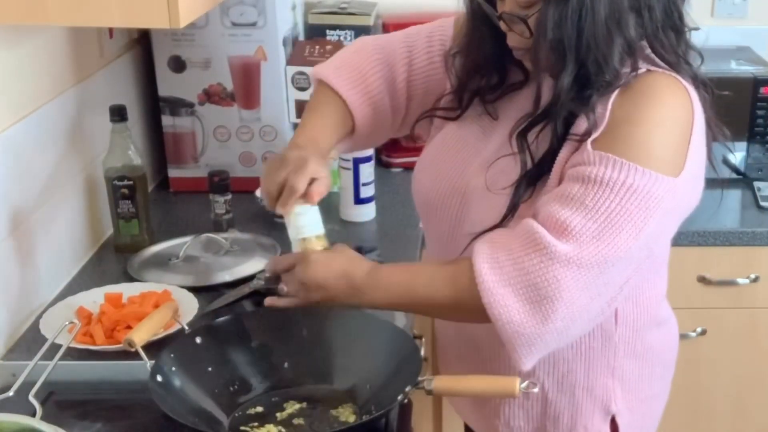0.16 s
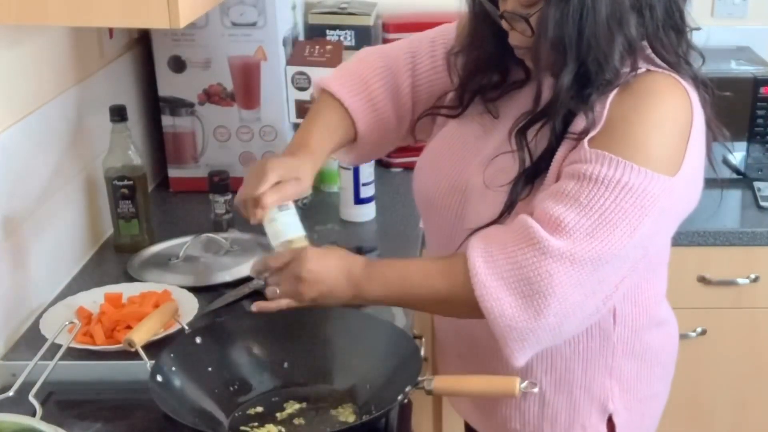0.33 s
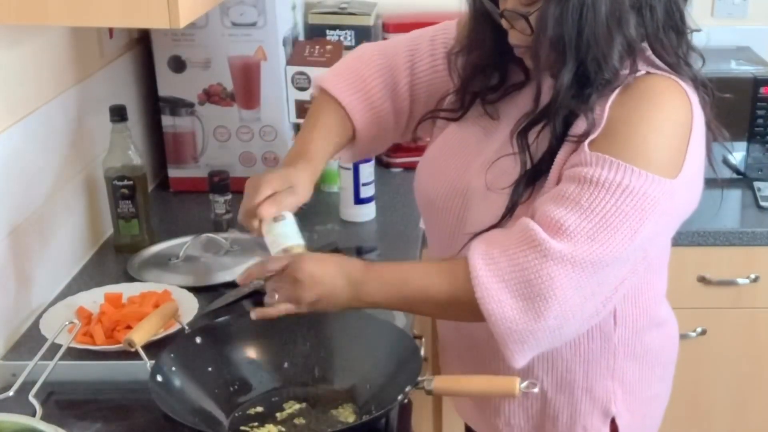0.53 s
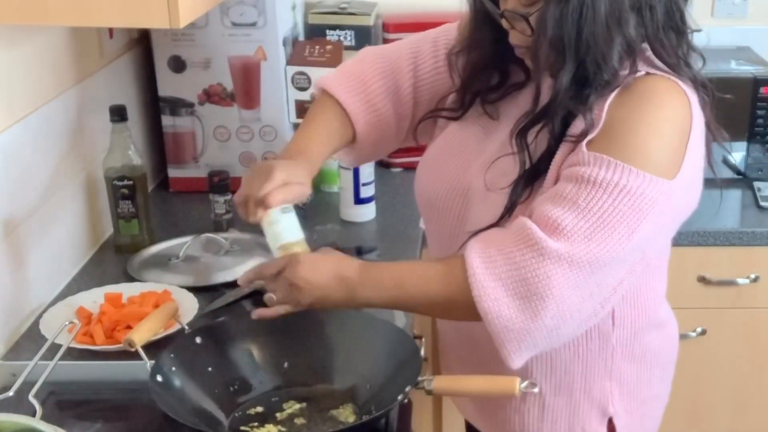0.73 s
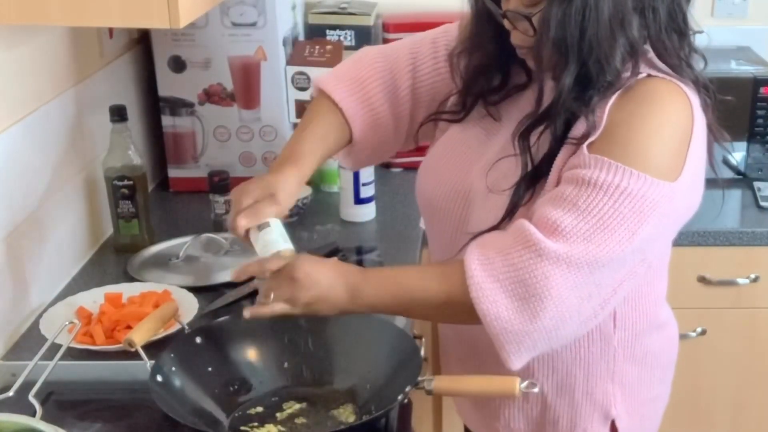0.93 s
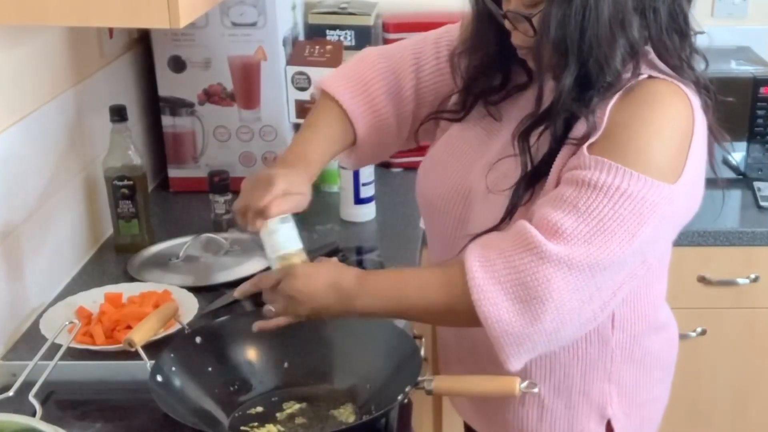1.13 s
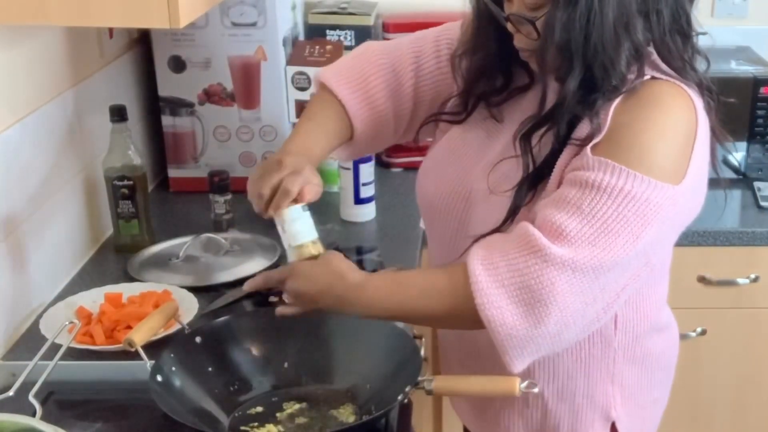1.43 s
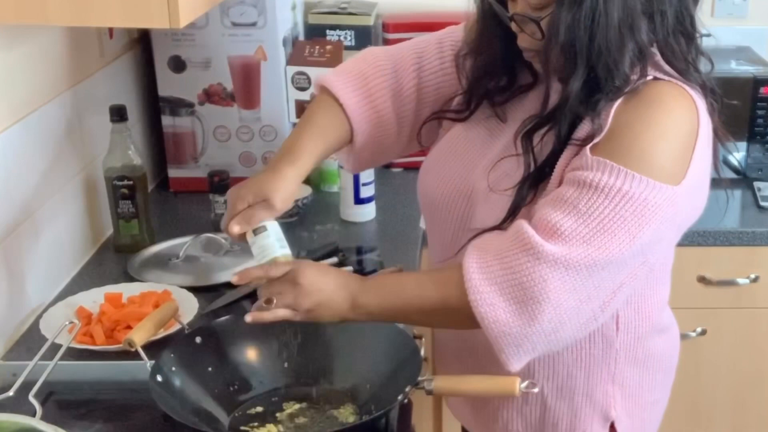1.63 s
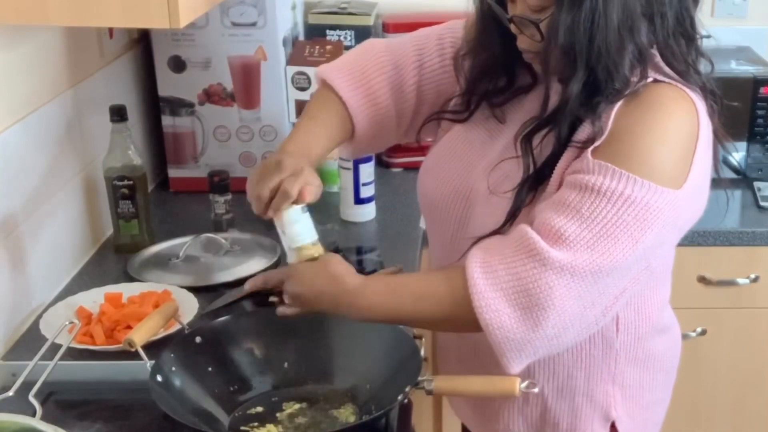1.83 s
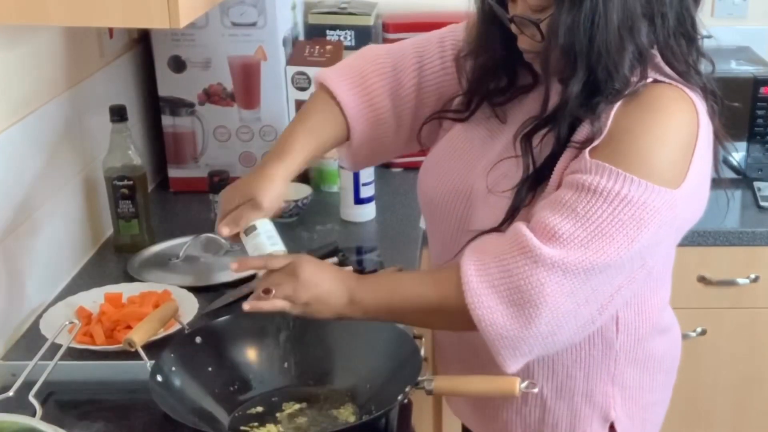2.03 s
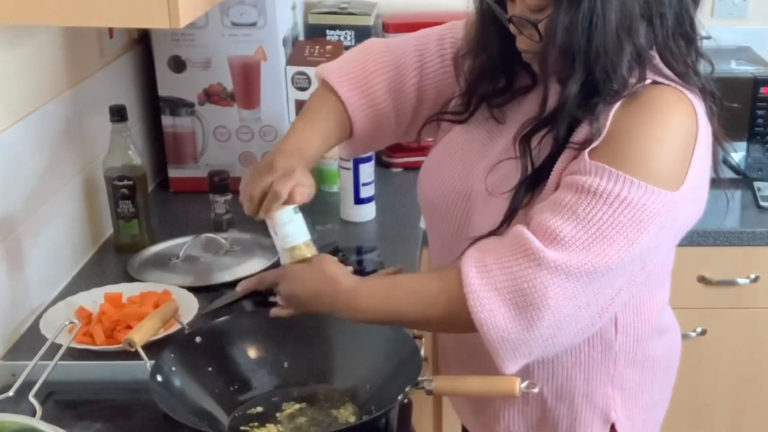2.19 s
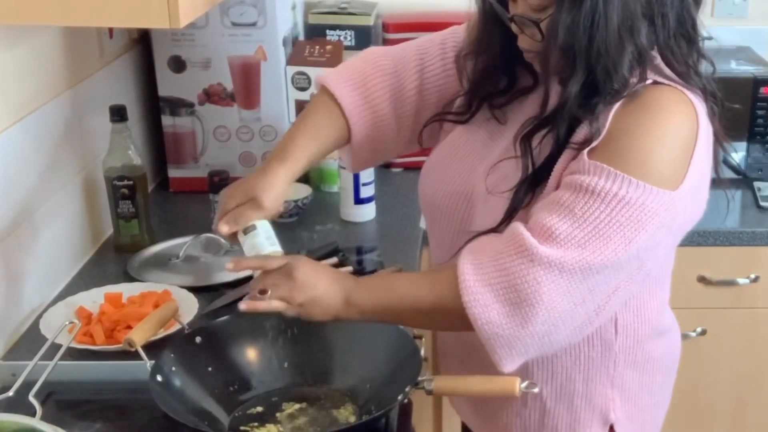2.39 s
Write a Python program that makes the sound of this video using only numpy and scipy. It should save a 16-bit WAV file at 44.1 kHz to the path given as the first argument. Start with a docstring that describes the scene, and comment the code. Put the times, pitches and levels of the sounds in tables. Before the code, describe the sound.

A small seasoning grinder is twisted six times, each a short, crisp crunch with snapping grains. Between twists the cap rasps back and knocks on the jar, over a faint hiss and appliance hum in a small kitchen.

```python
"""A small seasoning jar with a grinder cap is worked over a pan in six quick strokes, in a small kitchen.
Each stroke crushes grains in a dense crunch that rings the jar, and single large grains snap.
Between strokes the cap rasps back and knocks. Underneath lie a faint hiss, an appliance hum,
two whining motors and a few soft rumbles. The sound is in stereo, with wide echoes."""
import sys
import numpy as np
from scipy import signal
from scipy.fft import rfft, irfft, next_fast_len
from scipy.io import wavfile
from scipy.ndimage import uniform_filter1d

SR = 44100
rng = np.random.default_rng(int(sys.argv[2]) if len(sys.argv) > 2 else 0)


def wrap_up_sound(samples):
    """Save the sound to the file named by the first command line argument, as 16-bit audio."""
    columns = np.atleast_2d(samples).T
    # keep every value between -1 and 1, then stretch to whole-number steps
    tamed = np.clip(columns, -1, 1)
    steps = np.round(tamed * 32767).astype(np.int16)
    wavfile.write(sys.argv[1], SR, steps)


N = 112454

# grinding strokes: bite t/s, bite length/s, slack length/s, slack rise/s, slack level/dB,
# bite level/dB, brightness/(dB per octave), hollow tone f/Hz, its boost/dB
GRIND_STROKES = [(0.264, 0.076, 0.031, 0.0018, -35, -27, 1.8, 2960, 3.5),
                 (0.671, 0.099, 0.03, 0.019, -40.5, -28.5, 1.47, 1970, 3),
                 (1.123, 0.038, 0.055, .002, -37, -29, 0.95, 2180, 5),
                 (1.484, 0.082, 0.038, 0.029, -38, -31.5, 1, 2350, 4.5),
                 (1.86, 0.096, 0.013, 0.0024, -45, -29.5, 0.4, 2230, 1),
                 (2.243, 0.089, .013, 0.0092, -37.5, -32.5, 0.8, 1750, 2.5)]
# the cap turns back over loose grains: start t/s, end t/s, level/dB, brightness/(dB per octave)
CAP_RASPS = [(0.03, 0.164, -48.5, -1.4), (0.491, 0.549, -46, -0.9), (0.901, 0.942, -42.5, -2),
             (1.261, 1.365, -44, -1.56), (1.654, 1.654, -44, -2), (1.696, 1.77, -43.5, -0.5),
             (1.974, 2.047, -48.5, -1), (2.058, 2.133, -41.5, 1.5), (2.408, 2.499, -46.5, -0.2)]
# single grains crack: t/s, level/dB
GRAIN_CRACKS = [(.04, -22), (0.063, -15), (.179, -16), (.236, -5), (0.265, -6), (0.271, -6.5), (0.284, -2),
                (0.533, -14.5), (.678, -2.5), (0.754, -1), (0.873, -9.5), (.908, -9.5), (1.074, -1.5),
                (1.361, -26), (1.484, -6), (1.49, -10), (1.561, -10.5), (1.847, -7.5), (1.864, -10),
                (1.9, -6), (2.064, -3), (2.248, -4.5), (2.413, -16)]
# the cap knocks against the jar: t/s, level/dB, f/Hz
CAP_KNOCKS = [(0.041, -16, 2537), (0.065, -15.5, 2460), (.678, -6, 2600), (0.692, -6.5, 3020),
              (.753, -6, 1880), (0.894, -10.5, 3910), (1.073, -11, 2530), (1.076, -16, 3040),
              (1.081, -16, 3100), (1.739, -7.5, 2550), (1.741, -8, 4400), (1.743, -12, 1890),
              (1.87, -12, 4240), (1.996, -13.5, 3600), (2.016, -13.5, 2950), (2.063, -12, 2380),
              (2.103, -6, 3910), (2.246, -11.5, 2430), (2.249, -7, 3230), (2.369, -5, 2560),
              (2.386, -32, 2560), (2.446, -15.5, 4450), (2.464, -16, 3030)]
# broad tone colour of the crunch: f/Hz, level/dB
CRUNCH_COLOUR = [(100, -19), (300, -14.5), (450, -12.5), (680, -6), (900, -11), (1200, -1), (1800, 0),
                 (2500, 1.5), (4000, 2), (6100, 3), (7200, -1), (8300, -3.5), (10000, -2), (12000, -7),
                 (15600, -8)]
# pitches at which jar and cap ring (a dip if negative): f/Hz, boost/dB
JAR_RINGS = [(1272, 6.5), (1560, 3.5), (1770, 8.5), (1978, 0), (2520, 8), (2845, -14), (2983, 1.5),
             (3878, 1), (4770, 2.5), (6270, 1.5)]
# how long the room's echo takes to fade by 60 dB: f/Hz, t/s
ROOM_FADE = [(300, 0.27), (4000, 0.37), (14000, 0.25)]
# how alike echoes and hiss are in the left and right channels, wide below 8 kHz and
# mostly locked together above: f/Hz, likeness from 0 to 1
CHANNEL_LIKENESS = [(100, .3), (500, .1), (2500, 0), (7200, .05), (8300, .998), (10200, .998), (11200, .5),
                    (12600, .99)]
# phase of the right channel against the left, a slight lag that turns opposite at 8-10 kHz
# and is back in step above 12 kHz: f/Hz, phase/radians
RIGHT_PHASE = [(30, 0), (250, .6), (3000, .75), (6300, 1.9), (7500, 2.5), (8200, 3.12), (10200, 3.16),
               (11200, 5), (12200, 6.28)]
# tone colour of the hiss: f/Hz, level/dB
HISS_COLOUR = [(36, -31), (52, 12), (100, -1), (200, -0.5), (400, -9.5), (900, -7.5), (2000, 1.5),
               (6000, -2.5), (15000, -12)]
# steady tones of the appliance hum: f/Hz, level/dB
HUM_TONES = [(100, -78.5), (200, -75), (367, -85.5)]
# soft low rumbles: start t/s, end t/s, level/dB
LOW_RUMBLES = [(.31, .39, -67), (0.505, 0.62, -63), (0.707, 0.748, -68)]

GRAINS_PER_S, GRAIN_SPREAD_DB = 6500, 3
CLUMP_DB, CLUMP_S, CLUMP_BANDS_HZ = 2.5, .0073, np.geomspace(1000, 16000, num=14)
BODY_DB, BODY_HZ, BODY_RISE_S = -44.5, 445, .068
GLASS_DB, GLASS_FADE_S, JAR_RING_WIDTH_HZ = -15.5, .12, 45  # a fade is a drop of 60 dB
EARLY_DB, EARLY_FADE_S, FIRST_ECHO_S, MOVE_EVERY_S = -2.5, .046, .002, .2
WHINE_HZ, WHINE_DB, SECOND_WHINE_DB, BEAT_HZ, BEAT_PEAK_S = 509.4, -69.5, -70, 8.13, .07
WAVER_SHARE, WAVER_HZ = .3, 18
HISS_DB, RUMBLE_HZ = -57, 56

T = np.arange(N) / SR
FFT_SIZE = next_fast_len(N + SR // 4, real=True)
HZ = np.maximum(np.arange(FFT_SIZE // 2 + 1) * SR / FFT_SIZE, 1)


def crunch():
    """Each stroke takes up slack, then bites the grains; the hollow tone shifts with grip and filling."""
    clicks, out = clumped(grains(GRAINS_PER_S, GRAIN_SPREAD_DB)), 0
    for bite, length, slack_s, rise_s, slack_db, bite_db, tilt_db, hollow_hz, boost_db in GRIND_STROKES:
        slack = from_db(slack_db) * gate(bite - slack_s, bite, rise_s)
        biting = from_db(bite_db) * gate(bite, bite + length, rise_s=.0037)
        stroke = tilted(clicks * (slack + biting), tilt_db)
        hollow = resonate(stroke, hollow_hz, q=5.6)
        out = out + stroke + (from_db(boost_db) - 1) * hollow
    return out


def grains(per_s, spread_db):
    """Grains make tiny clicks at random times, most small and a few large."""
    sizes = from_db(spread_db * np.minimum(rng.exponential(1, N), 5))
    return unit_level(sizes * rng.choice([-1, 1], N) * (rng.random(N) < per_s / SR))


def clumped(clicks):
    """Grains of like size break in clumps, so each band of pitch swells and thins on its own."""
    spectrum, out = rfft(clicks, FFT_SIZE), 0
    for share in np.eye(len(CLUMP_BANDS_HZ)):
        band = irfft(spectrum * np.interp(HZ, CLUMP_BANDS_HZ, share), FFT_SIZE)[:N]
        swell = np.interp(T / CLUMP_S, np.arange(1500), rng.standard_normal(1500))
        out = out + band * from_db(CLUMP_DB * swell)
    return unit_level(out)


def jar_body():
    """The jar's hollow body drums low, swelling toward the end of each stroke."""
    ends = [bite + length for bite, length, *_ in GRIND_STROKES]
    swell = sum(gate(end - BODY_RISE_S, end, BODY_RISE_S) for end in ends)
    drum = resonate(grains(GRAINS_PER_S, GRAIN_SPREAD_DB), BODY_HZ, q=.38)
    return from_db(BODY_DB) * swell * unit_level(drum)


def rasp():
    """Fewer, softer grains slide in clumps as the cap turns back."""
    clicks = clumped(grains(per_s=900, spread_db=3.3))
    return sum(tilted(clicks * from_db(db) * gate(start, end), tilt_db)
               for start, end, db, tilt_db in CAP_RASPS)


def cracks():
    """Large grains snap crisply, with little bass."""
    snaps = sum(from_db(db) * burst(start, peak_s=.0008) for start, db in GRAIN_CRACKS)
    bass_cut = signal.butter(1, 1300, "high", fs=SR, output="sos")
    return signal.sosfilt(bass_cut, tilted(snaps, db_per_octave=1))


def knocks():
    """The cap chatters against the jar with a tick and a short ring; the glass rings on softly."""
    rings, ticks = 0, 0
    for start, db, hz in CAP_KNOCKS:
        contact = burst(start, peak_s=.0017)
        cap = unit_level(resonate(resonate(contact, hz, q=3.6), hz, q=3.6))
        glass = unit_level(resonate(contact, hz, q=np.pi * hz * GLASS_FADE_S / np.log(1000)))
        rings = rings + from_db(db) * (cap + from_db(GLASS_DB) * glass) / np.sqrt(N)
        ticks = ticks + from_db(db - 10.5) * contact
    return rings + jar(tilted(ticks, db_per_octave=1))


def burst(start, peak_s, size=2048):
    """A tight cluster of tiny breaks or touches builds up and dies away."""
    age = np.arange(size) / SR / peak_s
    cluster = evened(rng.standard_normal(size) * age * np.exp(-age))
    return np.pad(cluster, (int(start * SR), N))[:N]


def jar(x):
    """The jar colours a sound and rings at its own pitches."""
    boosts_db = sum(db / (1 + (2 * (HZ - hz) / JAR_RING_WIDTH_HZ) ** 2) for hz, db in JAR_RINGS)
    return filtered(x, causal_filter(at_hz(CRUNCH_COLOUR) + boosts_db))


def kitchen(x, tail_db):
    """The echoes change as the hands move the jar, so each short piece of sound gets its own."""
    out, step = np.zeros((2, N + SR)), int(MOVE_EVERY_S * SR)
    for i in range(0, N, step):
        heard = signal.fftconvolve(x[None, i:i + step], room_echo(tail_db), axes=1)
        out[:, i:i + heard.shape[1]] += heard
    return out[:, :N]


def room_echo(tail_db):
    """A click arrives directly, bounces off pan and worktop, then leaves a fading tail."""
    size = SR // 2
    t, tail = np.arange(size) / SR, 0
    for band_hz, fade_s in ROOM_FADE:
        share = [(hz, hz == band_hz) for hz, _ in ROOM_FADE]
        band = noise_pair(lambda hz: np.sqrt(at_hz(share, hz)), size)
        tail = tail + band * from_db(-60 * t / fade_s)
    early = noise_pair(np.ones_like, size) * from_db(-60 * t / EARLY_FADE_S)
    echoes = from_db(tail_db) * unit_level(tail) + from_db(EARLY_DB) * unit_level(early)
    delayed = np.pad(echoes / np.sqrt(size), ((0, 0), (int(FIRST_ECHO_S * SR), 0)))[:, :size]
    return evened((t == 0) + delayed)


def hiss():
    """A soft, steady hiss lies under everything."""
    noise = noise_pair(lambda hz: from_db(at_hz(HISS_COLOUR, hz)), FFT_SIZE)[:, :N]
    return from_db(HISS_DB) * unit_level(noise)


def hum():
    """An appliance hums on mains power."""
    return np.sqrt(2) * sum(from_db(db) * np.sin(2 * np.pi * (hz * T + rng.random()))
                            for hz, db in HUM_TONES)


def motors():
    """Two motors whine at nearly the same pitch, so they throb together; the level also wavers."""
    turn = 2 * np.pi * (T - BEAT_PEAK_S)
    first = from_db(WHINE_DB) * np.sin(WHINE_HZ * turn)
    second = from_db(SECOND_WHINE_DB) * np.sin((WHINE_HZ - BEAT_HZ) * turn)
    waver = unit_level(filtered(rng.standard_normal(FFT_SIZE), HZ < WAVER_HZ))
    return np.sqrt(2) * (first + second) * (1 + WAVER_SHARE * waver)


def rumbles():
    """The deep bass swells faintly and briefly."""
    swell = sum(from_db(db) * gate(start, end) for start, end, db in LOW_RUMBLES)
    bass_band = np.exp(-(2 * np.log2(HZ / RUMBLE_HZ)) ** 2)
    return swell * unit_level(filtered(rng.standard_normal(FFT_SIZE), bass_band))


def noise_pair(colour, size):
    """Noise for the left and right channels, more alike at some pitches than at others."""
    hz = np.maximum(np.arange(size // 2 + 1) * SR / size, 1)
    alike = np.clip(at_hz(CHANNEL_LIKENESS, hz), 0, .998)
    shared, opposed = rfft(rng.standard_normal((2, size)))
    pair = (np.sqrt(1 + alike) * shared + np.sqrt(1 - alike) * opposed * [[1], [-1]]) / np.sqrt(2)
    return irfft(pair * colour(hz), size)


def gate(start, end, rise_s=.0021, release_s=.015):
    """A loudness shape that rises, holds and quickly dies away."""
    return np.clip((T - start) / rise_s, 0, 1) * np.exp(-np.maximum(T - end, 0) / release_s)


def resonate(x, hz, q):
    """Ring at one pitch; a higher q rings longer."""
    return signal.lfilter(*signal.iirpeak(hz, q, fs=SR), x + 1e-18)


def tilted(x, db_per_octave):
    """Make a sound brighter or duller, leaving 4000 Hz as it is."""
    return filtered(x, from_db(db_per_octave * np.log2(np.maximum(HZ, 300) / 4000)))


def evened(x, width_hz=450):
    """Flatten a short sound's broad colour, keep its fine ripple and set its energy to 1."""
    size, spectrum = x.shape[-1], rfft(x)
    power = np.mean(np.abs(np.atleast_2d(spectrum)) ** 2, axis=0)
    broad_db = 10 * np.log10(uniform_filter1d(power, int(width_hz * size / SR)) + 1e-12)
    return unit_level(irfft(spectrum * causal_filter(-broad_db))) / np.sqrt(size)


def causal_filter(db):
    """A filter shaped like a dB curve that rings after a sound, never before it (minimum phase)."""
    cepstrum = irfft(np.log(from_db(db)))
    cepstrum[len(db) - 1:] = 0
    return unit_level(np.exp(2 * rfft(cepstrum)))


def filtered(x, gains):
    """Multiply each frequency of a sound by its own gain."""
    return irfft(rfft(x, FFT_SIZE) * gains, FFT_SIZE)[..., :N]


def at_hz(table, hz=HZ):
    """Read between the rows of a table, with octaves evenly spaced."""
    row_hz, values = np.transpose(table)
    return np.interp(np.log(hz), np.log(row_hz), values)


def unit_level(x):
    """Scale to an average (rms) level of 1."""
    return x / np.sqrt(np.mean(np.abs(x) ** 2) + 1e-20)


def from_db(db):
    """Turn decibels into a gain."""
    return 10 ** (np.asarray(db) / 20)


def scene():
    """The jar in the kitchen, with the right channel shifted in phase against the left."""
    seasoning = kitchen(jar(crunch() + jar_body() + rasp() + cracks()), tail_db=-2.5)
    cap = kitchen(knocks(), tail_db=-1.5)
    left, right = seasoning + cap + hiss() + hum() + motors() + rumbles()
    return np.array([left, filtered(right, np.exp(-1j * at_hz(RIGHT_PHASE)))])


def record(dry):
    """Cut the treble steeply above 15700 Hz."""
    return signal.sosfilt(signal.ellip(12, .1, 80, 15700, fs=SR, output="sos"), dry)


dry = scene()
out = record(dry)
wrap_up_sound(out)
```